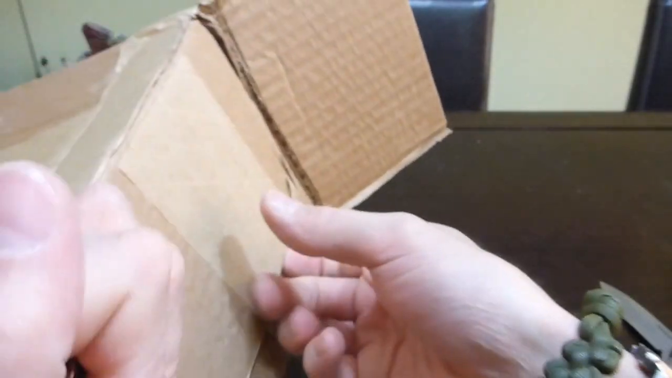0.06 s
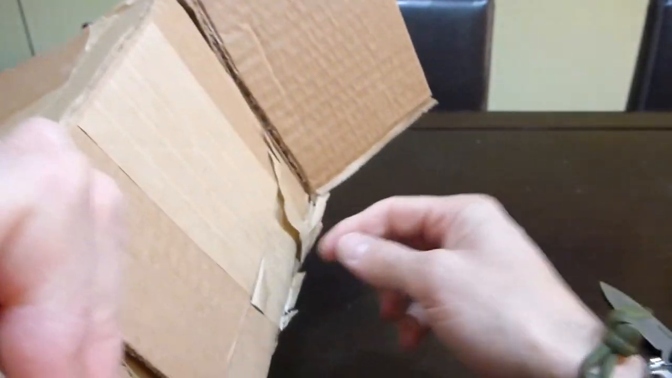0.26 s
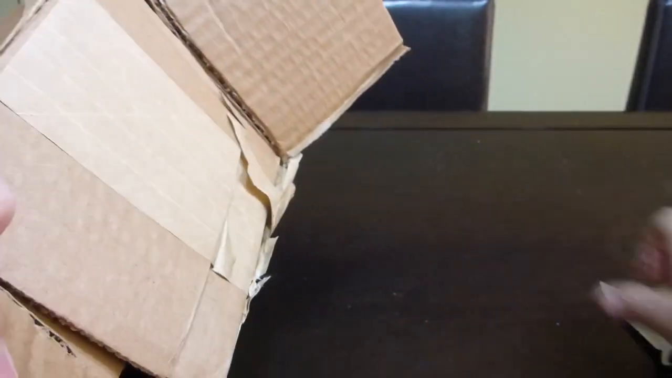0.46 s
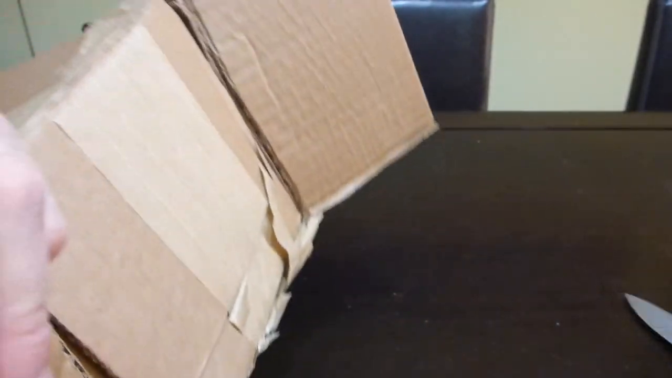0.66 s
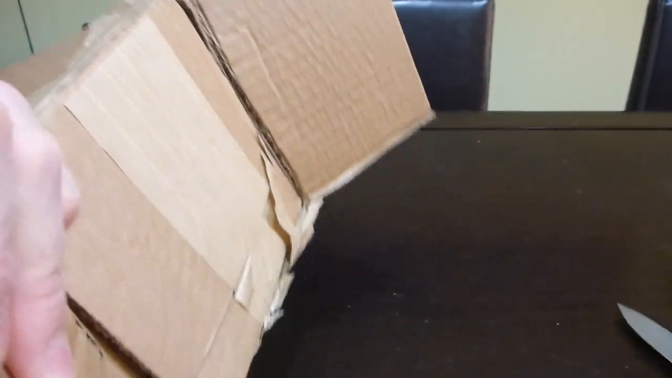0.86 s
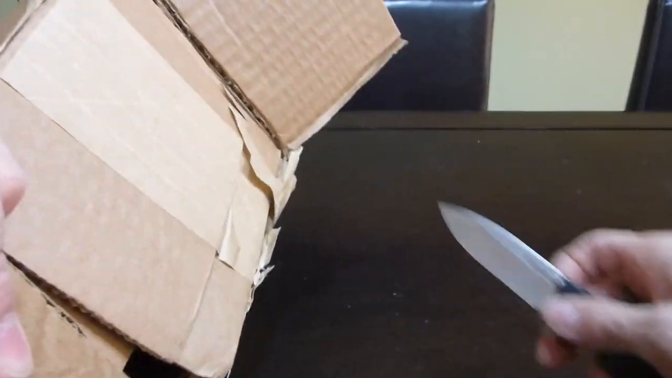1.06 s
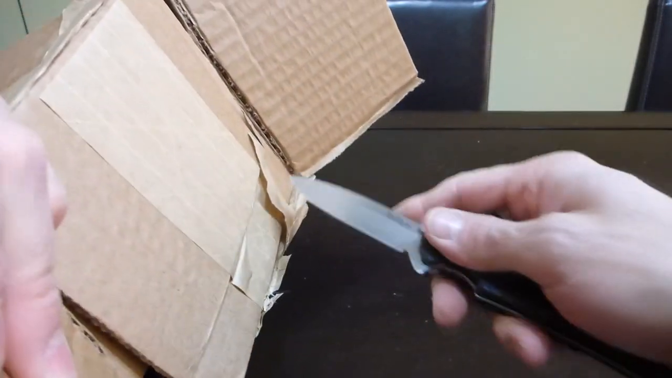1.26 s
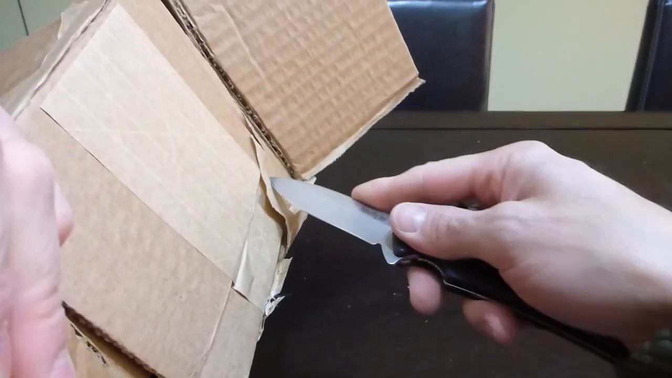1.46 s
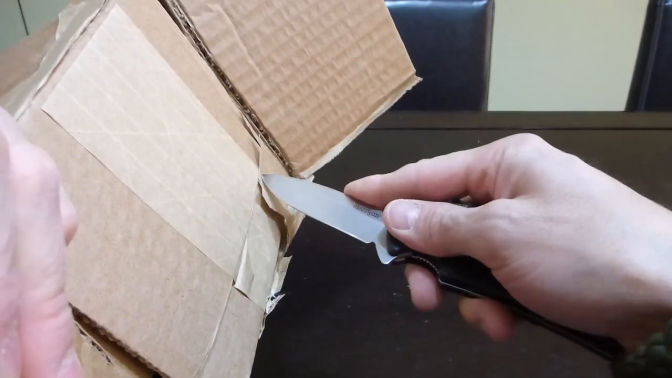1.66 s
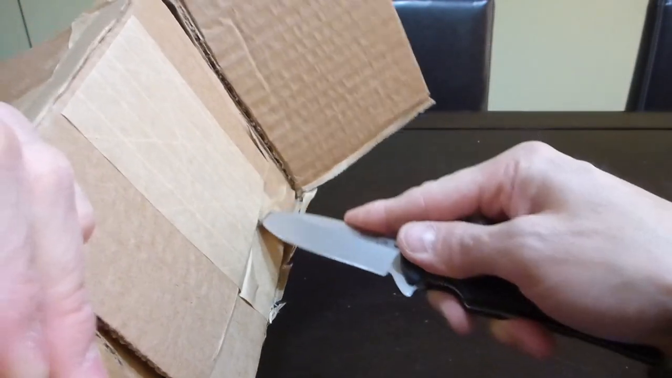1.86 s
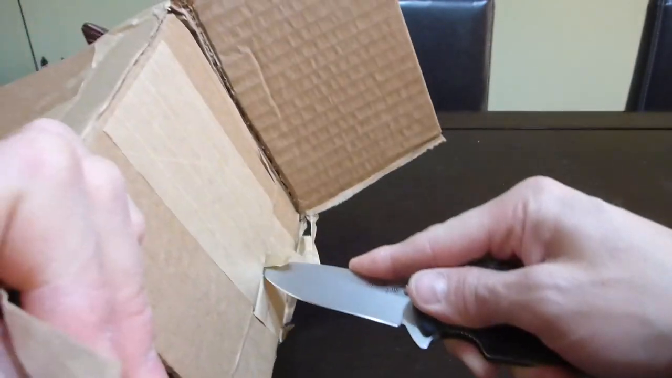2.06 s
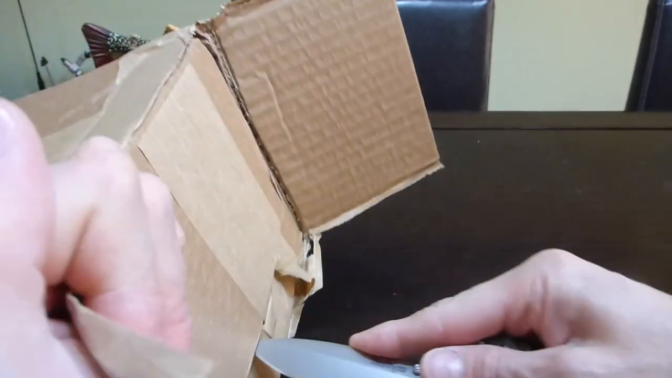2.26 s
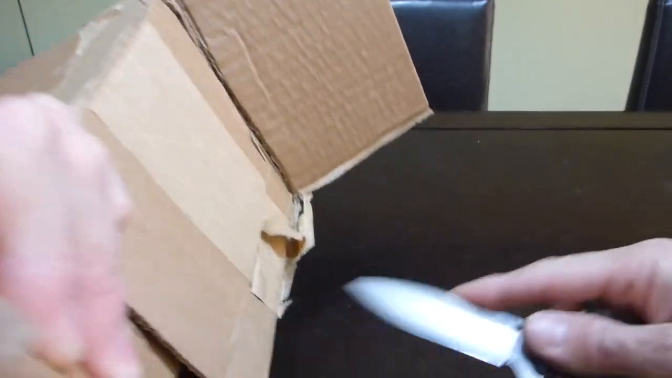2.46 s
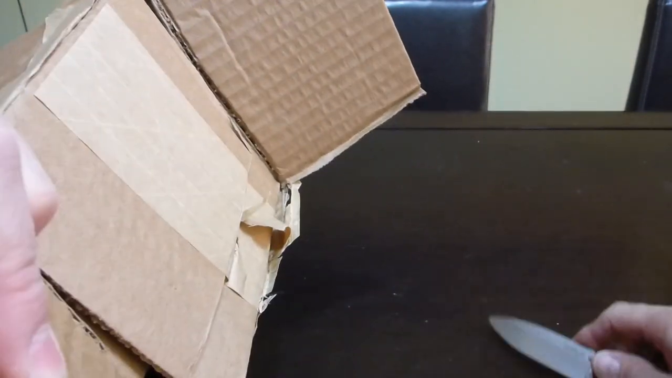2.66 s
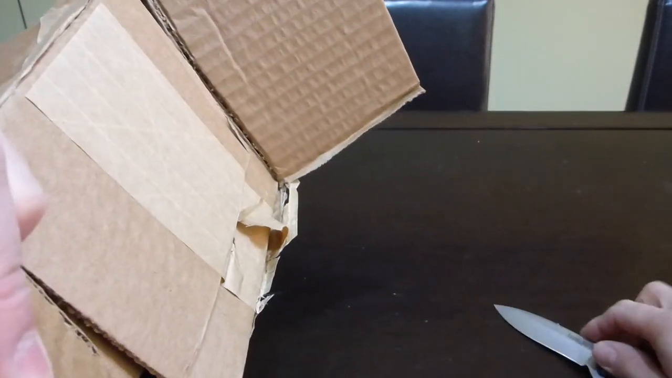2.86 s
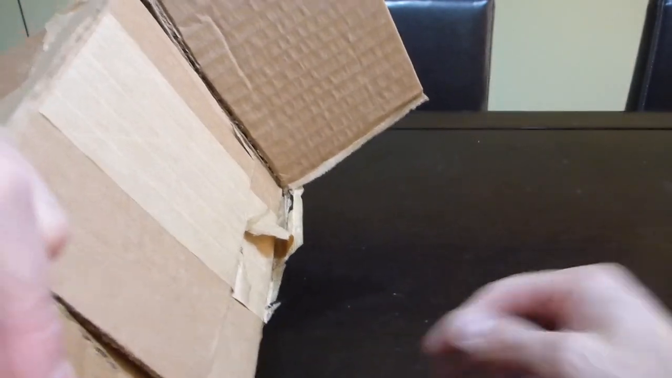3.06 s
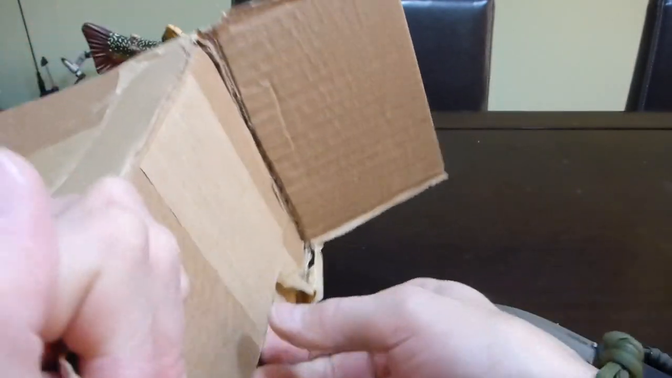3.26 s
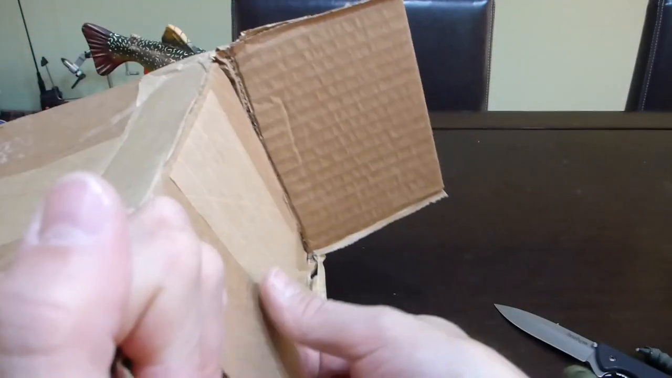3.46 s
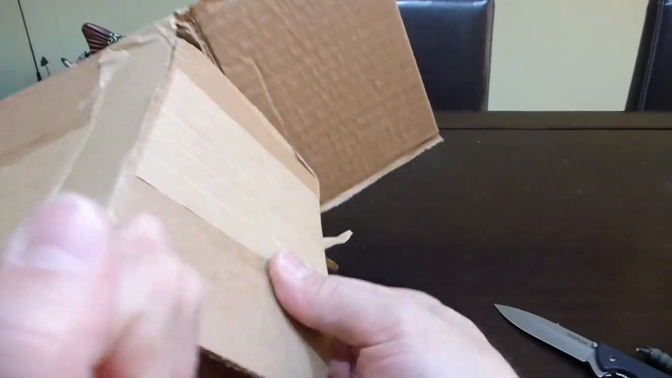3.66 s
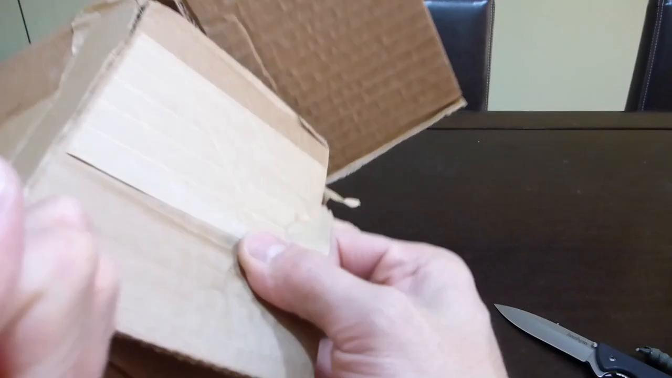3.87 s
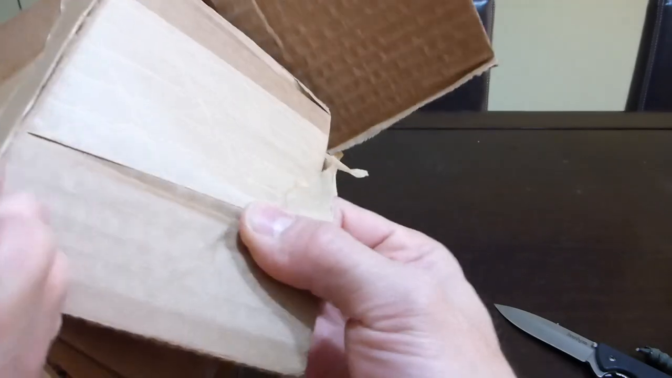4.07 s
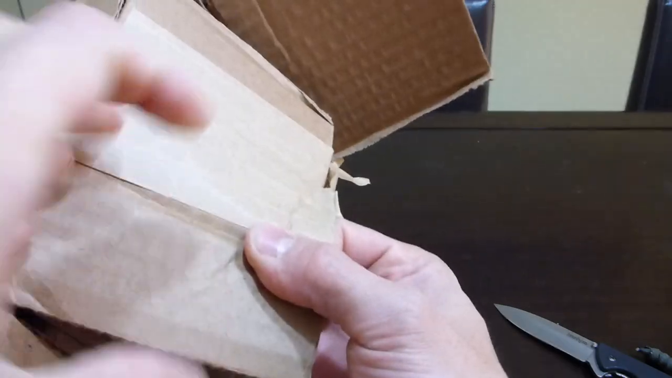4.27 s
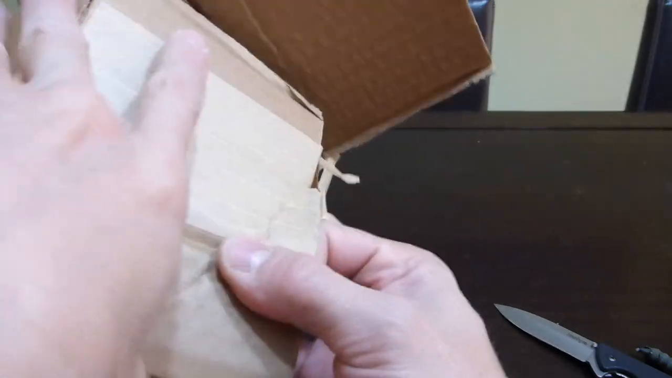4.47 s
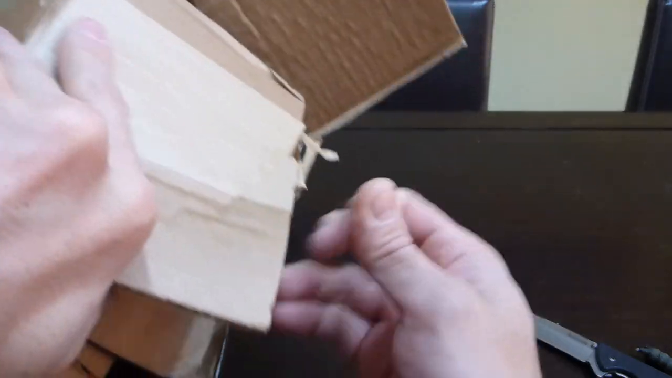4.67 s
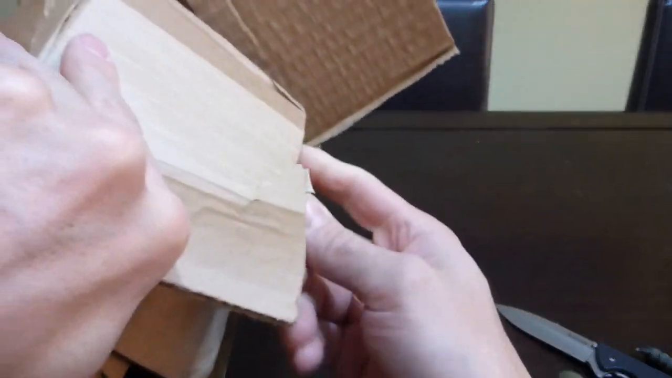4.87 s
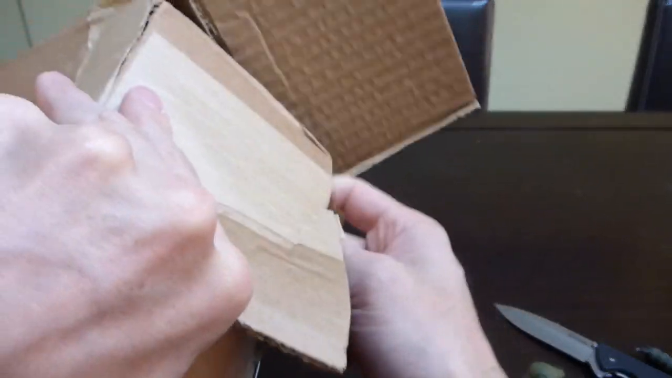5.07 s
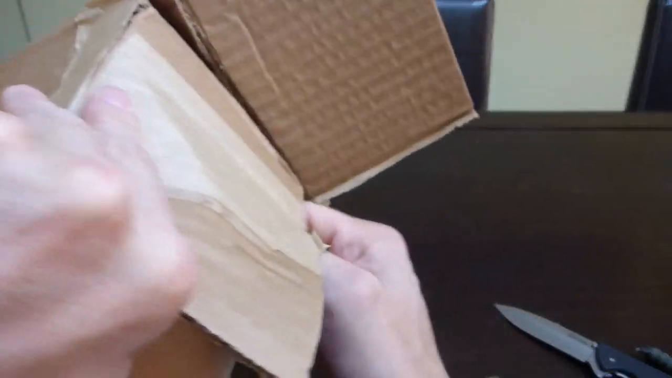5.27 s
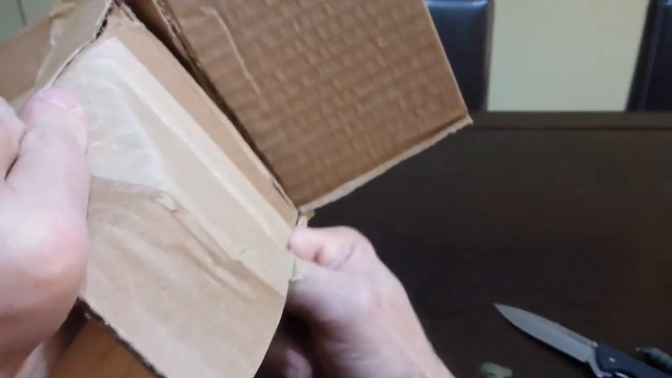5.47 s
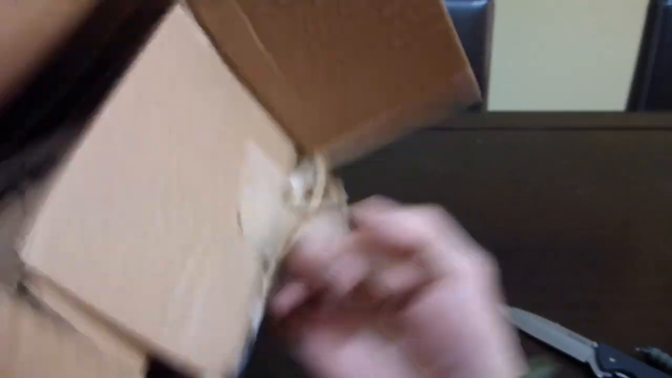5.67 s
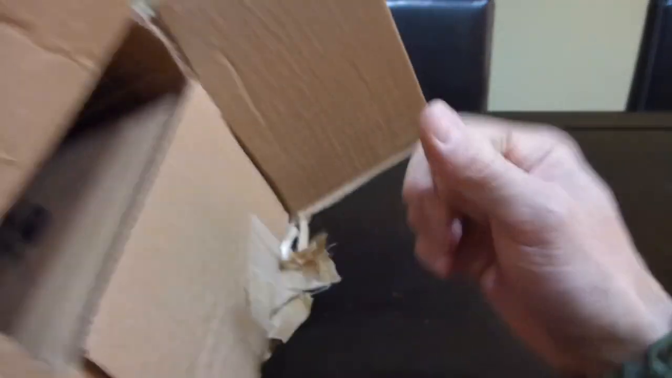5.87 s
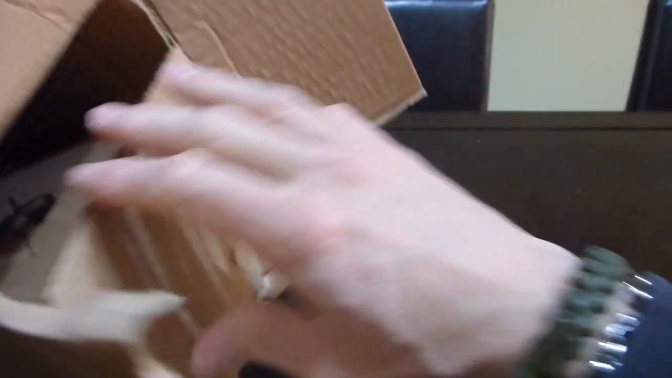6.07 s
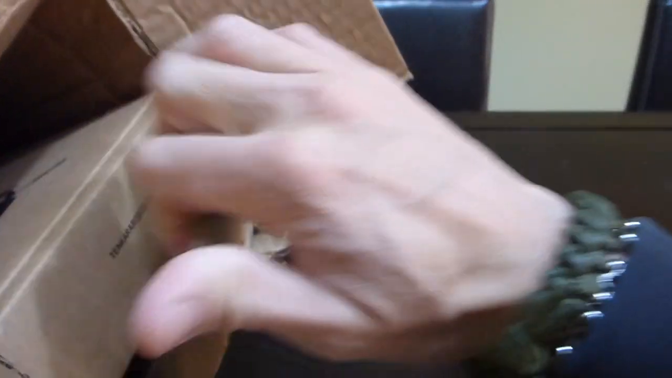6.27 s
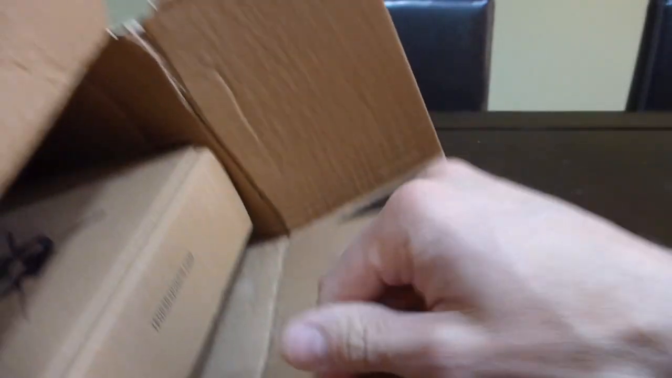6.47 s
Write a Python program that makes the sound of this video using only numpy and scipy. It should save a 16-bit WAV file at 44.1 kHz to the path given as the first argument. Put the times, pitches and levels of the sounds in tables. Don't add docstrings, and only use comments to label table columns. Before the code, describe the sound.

Close cardboard unboxing: dry scrapes, hollow bumps and tape snaps, hard knife knocks on wood, ending in loud pops and a tearing flap.

```python
import sys
import numpy as np
from scipy import signal
from scipy.fft import rfft, irfft
from scipy.io import wavfile
from scipy.ndimage import uniform_filter1d

SR = 44100
rng = np.random.default_rng(int(sys.argv[2]) if len(sys.argv) > 2 else 0)


def voltage_ratio(level):
    return 10 ** (np.asarray(level, float) / 20)


def store_pcm(level_fs):
    pcm = np.round(np.clip(level_fs, -1, 1) * 32767).astype(np.int16)
    wavfile.write(sys.argv[1], SR, np.atleast_2d(pcm).T)


N = 287796

# t/s, left minus right/dB
HAND_SIDE = [(0.1, -3), (.6, -6.5), (.95, 7), (3.3, 3.5), (3.6, -3), (6.4, 0.5)]


def unit(x):
    return x / np.sqrt(np.mean(x ** 2) + 1e-30)


def spread(mid, side, apart=1):
    return mid + apart * side * np.array([[1], [-1]])


def colour(x, points):
    hz, db = np.transpose(points)
    size = 8192
    f = np.arange(size // 2 + 1) * SR / size + 1
    log_gain = np.interp(np.log(f), np.log(hz), db) * np.log(10) / 20
    cepstrum = irfft(log_gain)[:size // 2]
    cepstrum[1:] *= 2
    response = irfft(np.exp(rfft(cepstrum, size)))[:size // 2]
    response = response.reshape((1,) * (x.ndim - 1) + (-1,))
    return signal.fftconvolve(x, response, axes=-1)[..., :x.shape[-1]]


def hump(hz, low_db, high_db):
    return [(hz / 8, -low_db), (hz, 0), (hz * 8, -high_db), (hz * 64, -2 * high_db)]


def fade(seconds, t60_s):
    return np.exp(-np.log(1000) * np.arange(int(seconds * SR)) / SR / t60_s)


def jolt(seconds, t60_s, spike, rise_s):
    decay = fade(seconds, t60_s) + spike * fade(seconds, t60_s / 6)
    return decay * (1 - fade(seconds, rise_s))


def ring(modes, seconds):
    t_s = np.arange(int(seconds * SR)) / SR
    return sum(voltage_ratio(db) * np.sin(2 * np.pi * hz * t_s) * fade(seconds, t60_s) for hz, db, t60_s in modes)


def add(out, s, sound, peak_db, pan_db=0):
    i = int(s * SR)
    sound = sound[..., :N - i] * voltage_ratio(peak_db) / np.abs(sound).max()
    out[:, i:i + sound.shape[-1]] += sound * voltage_ratio(np.array([[pan_db / 2], [-pan_db / 2]]))


def grains(per_s, scatter_db, points, t60_s, apart):
    clump_db = 2
    chance = rng.random((2, N))
    size = voltage_ratio(-scatter_db * np.log(1 - 0.97 * chance[1])) * (chance[0] < per_s / SR)
    pulse = fade(0.15, t60_s) * (1 - fade(0.15, t60_s / 2))
    shaking = np.sqrt(np.abs(signal.fftconvolve(size ** 2, pulse ** 2)[:N]))
    hold = SR // 50
    steps = np.repeat(rng.standard_normal(N // hold + 1), hold)[:N]
    clump = uniform_filter1d(steps, hold)
    mid, side = rng.standard_normal((2, N))
    return unit(colour(spread(mid, side, apart) * shaking * voltage_ratio(clump_db * clump), points))


def effort(layer_db, bright_share, shudder_db=0):
    press_db_s, lift_db_s, jolt_db_s = 420, 176, 4000
    # start t/s, length/s, level/dB, brightness/dB
    strokes = [(0, 0.041, -44, 1.5), (0.105, 0.25, -45, 4), (0.585, 0.043, -58, 3), (1.106, 0.15, -60, 5),
               (1.632, 0.014, -50.5, -3.5), (1.718, 0.13, -60.5, -25), (1.917, 0.23, -45.5, 1.5),
               (2.165, 0.013, -32.5, -2), (2.284, 0.082, -44, -1.5), (2.549, 0.29, -63.5, 1),
               (3.362, 0.18, -50.5, 4.5), (3.533, 0.17, -44.5, 2), (3.732, 0.054, -26, 0.5),
               (3.854, 0.11, -32.5, 2), (3.978, 0.14, -36.5, -1), (4.152, 0.091, -40, -0.5),
               (4.308, 0.013, -38, 3.5), (4.415, 0.064, -41, -0.5), (4.5, 0.067, -58.5, 15),
               (4.583, 0.01, -35.5, 3), (4.718, 0.044, -44.5, 4), (4.778, 0.0071, -33.5, 1.5),
               (4.854, 0.13, -42, -3.5), (5.008, 0.088, -51, 2), (5.132, 0.032, -44, 6.5),
               (5.238, 0.011, -33, 3), (5.34, 0.17, -41.5, 6.5), (5.674, 0.13, -44.5, 6),
               (6.27, 0.028, -40, -6), (6.384, 0.15, -39, 1.5)]
    # t/s, level/dB, decay/(dB/s), brightness/dB
    shudders = [
        (.4, -58.5, 31, 4.5),
        (0.747, -33.5, 88.5, -8),
        (.9, -46, 124.5, -20),
        (2.364, -23.5, 201, -5),
        (3.014, -21, 297, -14.5),
        (3.17, -46, 161, -3.5),
        (5.542, -23, 95, -2),
        (5.82, -20.5, 94, -1.5),
        (6.02, -34, 80, -6.5),
    ]
    moves = [(s, s + length_s, db, bright_db, press_db_s, lift_db_s) for s, length_s, db, bright_db in strokes]
    moves += [(s, s, db + shudder_db, bright_db, jolt_db_s, dying) for s, db, dying, bright_db in shudders]
    t_s = np.arange(N) / SR
    coarse_s = t_s[::64]
    power = 0
    for start, end, db, bright_db, rise, fall in moves:
        before_db = rise * np.maximum(start - coarse_s, 0)
        after_db = abs(fall) * np.maximum(coarse_s - end, 0)
        power = power + voltage_ratio(2 * (db + bright_share * bright_db - before_db - after_db))
    return voltage_ratio(layer_db) * np.interp(t_s, coarse_s, np.sqrt(power))


def rubbing():
    # f/Hz, density/dB
    boom_tone = [(18, -74.5), (30, -6), (163, -9.5), (250, -8.5), (383, -1), (461, -3.5), (509, -5.5),
                 (900, -10.5), (1170, -14), (1980, -120)]
    rasp_tone = [(290, -34), (500, -25), (638, -4), (1530, -4.5), (2200, -10.5), (3200, -18), (5000, -37),
                 (7700, -120)]
    fibre_tone = [(1300, -14), (2300, -2.5), (3200, -1.5), (5000, 2.5), (7000, -7.5), (10000, -21.5)]
    crackle_tone = [(4000, -25), (7000, 1), (10000, -3), (13000, -8.5), (16000, -15)]
    boom = effort(0.11, -0.28, shudder_db=6) * voltage_ratio(-3) * grains(200, 1.0, boom_tone, 0.078, 0.066)
    rasp = effort(-2.5, 0) * grains(400, 4.34, rasp_tone, 0.02, 0.089)
    fibre = effort(-7, 1.16) * voltage_ratio(-2.5) * grains(1000, 5.0, fibre_tone, 0.009, 0.8)
    crackle = effort(-20.5, 1.2, shudder_db=-0.5) * voltage_ratio(3.0) * grains(900, 4.0, crackle_tone, 0.032, 0.94)
    return boom + rasp + fibre + crackle


def knocks():
    # t/s, peak/dB, centre f/Hz, t60/s
    bumps = [(0.6239, -22, 962, 0.022), (0.829, -16, 850, 0.12), (.872, -12, 703, 0.1),
             (0.927, -22, 716, 0.071), (1.187, -36.5, 586, 0.14), (1.687, -37.5, 1160, 0.066),
             (2.326, -24.5, 560, 0.074), (2.776, -40.5, 490, 0.28), (2.824, -35, 313, 0.071),
             (3.031, -21, 378, 0.015), (3.057, -20.5, 627, 0.28), (3.156, -23.5, 528, 0.22),
             (3.189, -28.5, 323, 0.094), (3.848, -25, 550, 0.036), (3.93, -14.5, 430, 0.15),
             (4.167, -33, 289, 0.23), (4.3042, -25, 1174, 0.22), (4.483, -23, 516, 0.19),
             (4.616, -22.5, 1126, 0.062), (4.776, -24, 436.5, 0.21), (4.796, -23.5, 403, 0.17),
             (5.913, -16, 416, 0.1), (6.124, -21, 490, 0.11)]
    # t/s, peak/dB, t60/s
    thuds = [(0.15, -23, 0.086), (.169, -58, .11), (0.369, -26, 0.044), (1.008, -22.5, 0.087),
             (1.631, -37.5, 0.04), (2.148, -20, 0.042), (2.177, -22.5, 0.042), (2.387, -14, 0.05),
             (3.342, -29, 0.24), (3.733, -19, 0.035), (4.236, -29.5, 0.16), (4.88, -26, 0.096),
             (5.182, -26, 0.1), (5.269, -26.5, 0.068), (5.718, -21.5, 0.057), (5.84, -14.5, 0.14),
             (5.878, -9.5, 0.1), (5.988, -19.5, 0.13), (6.28, -22, 0.2), (6.413, -34, 0.098),
             (6.498, -32, 0.027)]
    # t/s, peak/dB, centre f/Hz,
    # t60/s
    buckles = [(0.862, -20, 1460, 0.08), (2.197, -18.5, 715, 0.043), (2.357, -12, 987, 0.079),
               (2.97, -17.5, 1340, 0.085), (3.532, -19.5, 1540, 0.026), (3.65, -19, 1237, 0.14),
               (3.714, -15.5, 1820, 0.11), (3.912, -3, 936, 0.08), (4.421, -17, 2290, 0.064),
               (4.599, -20, 960, 0.12), (5.257, -9.5, 2000, 0.007), (5.401, -20, 970, 0.12),
               (5.4616, -17, 1120, 0.024), (5.4755, -6.5, 1010, 0.028), (5.532, -5, 1350, 0.018),
               (5.5374, -8, 774, 0.05), (5.637, -14, 1290, 0.02), (5.6412, -19, 1140, 0.025),
               (5.8094, -12.5, 1060, 0.015), (6.052, -13.5, 1370, 0.024), (6.357, -19.5, 1516, 0.036)]
    wall_hz = 399
    bump_boom_db, thud_boom_db, buckle_boom_db = 2.5, -31, -42
    blows = [(*row, bump_boom_db) for row in bumps]
    blows += [(*row, buckle_boom_db) for row in buckles]
    blows += [(s, db, wall_hz, t60_s, thud_boom_db) for s, db, t60_s in thuds]
    blows.sort()
    out, shake = np.zeros((2, N)), rng.standard_normal(N + SR)
    chance = rng.random((len(blows), 3, 16))
    for (s, db, hz, t60_s, boom_db), (place, size, life) in zip(blows, chance):
        noise, t60_s = shake[int(s * SR):], np.clip(t60_s, 0.008, 0.3)
        push = noise[:SR // 50] * fade(1 / 50, 0.16 * t60_s)
        mode_hz = hz * 2 ** (3.2 * (place - 0.65))
        mode_db = -9 * np.abs(np.log2(mode_hz / hz)) - 6 * size
        mode_t60_s = t60_s * (0.51 + 0.5 * life) * (hz / mode_hz) ** 0.5
        panel = ring(zip(mode_hz, mode_db, mode_t60_s), 1 / 5)
        add(out, s, signal.fftconvolve(panel, push), db)
        rattle = noise[:SR // 4] * jolt(1 / 4, 1.28 * t60_s, 1.0, 0.0066)
        add(out, s, colour(rattle, hump(hz, 40.7, 27.7)), db + 0.5)
        add(out, s, ring([(hz, 0, 8 / hz)], 1 / 20), db + 7 * np.log2(hz / 1100))
        boom = ring(zip(150 + 350 * place[:8], -8 * size, 0.13 + 0.19 * life), 1 / 5)
        add(out, s, signal.fftconvolve(boom, push), db + boom_db - 6.0)
    return colour(out, [(1900, -1.5), (4500, -14.5)])


def pops():
    # t/s, peak/dB, f/Hz
    breaks = [(0.7379, -5.5, 1380), (0.826, -16, 910), (0.863, -13, 1293), (2.148, -20.5, 1200),
              (5.5333, -2.5, 1200), (5.4758, -14.5, 1172), (2.3583, -10, 1630), (2.865, -5, 1560),
              (2.9987, -6, 840), (3.9127, -4.5, 1117), (3.915, -8.5, 1020), (4.304, -18, 1380),
              (4.802, -21.5, 897), (5.462, -21, 1200), (5.5311, 0.1, 1140), (5.5358, -2, 1240),
              (5.636, -6.5, 1420), (5.642, -7.5, 1270), (5.72, -24, 1330), (5.8105, 2.2, 1185),
              (5.865, -12, 620), (6.055, -27, 1340), (6.412, -29, 1350)]
    decay_cycles, rise_cycles = 7, 4
    out = np.zeros((2, N))
    for s, db, hz in breaks:
        t60_s = decay_cycles / hz
        cycles = ring([(hz, 0, t60_s), (1.6 * hz, -14, t60_s)], 1 / 20)
        add(out, s, cycles * (1 - fade(1 / 20, rise_cycles / hz)), db)
    return out


def snaps():
    # t/s, peak/dB, treble/dB, left minus right/dB
    sharp_cracks = [(0.737, -27, -49.5, 12), (0.8271, -22, -24, 7.5), (0.861, -43, -26, 8),
                    (2.148, -19.5, -16.5, 12), (2.1766, -20, -30.5, -2), (2.359, -12.5, -35.5, -3.5),
                    (2.386, -23.5, -37.5, 12), (2.8648, -20, -18, 12), (2.968, -38, -38, 9.5),
                    (3.651, -18, -27, 0.5), (3.7145, -34, -37, 12), (3.855, -26.5, -29.5, 8),
                    (3.914, -6.5, -29, 16), (4.3045, -30, -41, -2), (4.421, -28, -59, -8), (4.4327, -27, -20, -2),
                    (4.483, -29.5, -13, -3), (5.132, -33, -36, -3), (5.236, -23, -30, -1), (5.269, -20, -34, -4),
                    (5.399, -18, -40, -2), (5.435, -29.5, -11, -5), (5.4751, -17.5, -15, -3.5),
                    (5.532, -10.5, -17, -3.5), (5.6353, -13, -20, -2.5), (5.643, -18, -39, 4),
                    (5.8102, -15, -16.5, -13.5), (5.907, -24, -19, 3), (6.4958, -26, -29.5, 12)]
    # t/s, peak/dB
    fibres = [(0.0798, -36), (0.108, -40), (0.1463, -34.5), (0.203, -59), (0.282, -35.5), (0.367, -38),
              (0.611, -42.5), (.625, -30), (.746, -37.5), (0.817, -34), (.8451, -43), (0.8706, -36.5),
              (.894, -39), (1.0585, -47), (1.0857, -49.5), (0.925, -42), (1.0084, -46), (1.1019, -42.5),
              (1.206, -43.5), (1.2568, -43.5), (1.688, -43), (1.7837, -49), (2.3273, -34), (2.4975, -33.5),
              (2.521, -43), (3.3388, -40.5), (3.5329, -28.5), (4.2268, -40), (4.7161, -39), (4.774, -32.5),
              (5.2582, -22.5), (6.025, -34), (6.052, -40), (6.257, -50), (6.2772, -32.5), (6.357, -33)]
    fibre_treble_db = -16.5
    ticks = [(s, db, fibre_treble_db, np.interp(s, *np.transpose(HAND_SIDE))) for s, db in fibres]
    out, shake = np.zeros((2, N)), rng.standard_normal((2, N + SR))
    shape = (fade(0.1, 0.0066) + 0.075 * fade(0.1, 0.094)) * (1 - fade(0.1, 0.0026))
    for s, db, treble_db, pan_db in sharp_cracks + ticks:
        mid, side = shake[:, int(s * SR):int(s * SR) + len(shape)]
        crack = spread(mid, side, 1.1) * shape
        tone = [(500, -10.5), (2500, 1.5), (4900, 8.0), (11000, treble_db + 7.5), (16000, 0.67 * treble_db - 2.5)]
        add(out, s, colour(crack, tone), db + 6.5, np.clip(pan_db, -12, 12))
    return out


def creases():
    # t/s, peak/dB, centre f/Hz, t60/s
    slip_bursts = [(.128, -37, 4200, .05), (.18, -37, 3300, 0.045), (0.205, -35.5, 6500, 0.018),
                   (.23, -40, 3430, 0.014), (0.267, -35, 5000, 0.012), (.307, -34, 5200, .015),
                   (.331, -44, 5000, .015), (1.27, -40.5, 5500, 0.036), (1.319, -52.5, 4510, .015),
                   (1.375, -55.5, 5500, .1), (1.625, -47.5, 5170, 0.066), (1.695, -47, 6400, 0.055),
                   (.815, -17, 334, 0.33), (0.875, -15, 794, 0.086), (.93, -35, 990, 0.049),
                   (1.017, -27, 527, 0.12), (2.122, -34, 3200, 0.041), (2.179, -21.5, 4770, .04),
                   (2.194, -26, 4740, 0.064), (2.297, -37, 5200, .02), (2.33, -32, 5860, 0.029),
                   (2.3565, -15.5, 4900, 0.045), (2.389, -21.5, 5330, 0.058), (2.391, -23.5, 2040, 0.12),
                   (2.87, -30, 3590, 0.2), (3.011, -23, 2580, 0.065), (0.74, -17, 2500, 0.033),
                   (2.91, -40.5, 8500, 0.08), (2.9984, -23.5, 6200, .015), (3.1226, -26.5, 5650, .012),
                   (3.645, -33, 990, 0.039), (3.659, -24, 3240, 0.085), (3.685, -35, 1460, .04),
                   (3.74, -22, 1300, 0.049), (3.769, -20.5, 4040, 0.052), (3.786, -32, 1300, 0.058),
                   (3.802, -20, 1410, 0.061), (3.805, -27, 4800, 0.021), (3.884, -31, 4700, 0.025),
                   (3.906, -17, 1510, 0.059), (3.917, -12.5, 4670, 0.046), (3.922, -11.5, 450, 0.023),
                   (3.932, -17, 1560, 0.07), (3.965, -20, 1530, 0.083), (4.276, -39, 1150, .04),
                   (4.316, -23.5, 3100, 0.089), (4.421, -7, 2800, 0.0047), (4.488, -27, 1060, 0.035),
                   (4.586, -25, 3540, .06),
                   (4.432, -27, 2500, 0.046), (4.816, -32, 796, 0.037), (5.181, -24.5, 1510, 0.036),
            (5.242, -19.5, 1470, 0.056), (6.25, -44, 2500, .015), (6.28, -36, 5300, 0.026),
            (6.48, -25, 4300, 0.038), (4.62, -25.5, 1190, 0.054), (4.748, -39, 3000, 0.036),
            (5.111, -35, 1580, 0.026), (5.142, -30, 1550, 0.037), (5.161, -30, 1740, 0.044),
            (5.231, -25, 1690, 0.044), (5.313, -27, 2110, 0.026), (5.334, -43, 1610, 0.025),
            (5.434, -21, 1220, 0.017), (5.46, -29, 4000, 0.01), (5.546, -20, 1300, 0.13),
            (5.555, -20, 2730, 0.34), (5.563, -11.5, 850, 0.12), (5.596, -19, 886, 0.085),
            (5.637, -24, 5170, 0.0086), (5.6408, -11, 4670, .015), (5.66, -25, 4900, 0.021),
            (5.8118, -20, 1240, 0.014), (5.824, -13.5, 1280, 0.066), (5.841, -14.5, 700, 0.11),
            (5.85, -22.5, 4450, 0.21), (5.867, -15.5, 600, 0.038), (5.876, -13, 1020, 0.05),
            (5.884, -26, 7500, 0.017), (5.906, -7, 1380, 0.019), (5.916, -17, 520, .03),
            (5.999, -29, 500, 0.056), (6.094, -29, 980, 0.039), (6.125, -25.5, 1470, 0.071),
            (6.181, -25, 1150, 0.047), (6.2583, -28.5, 1840, .03), (6.276, -20.5, 1860, 0.043),
            (6.4288, -33, 1050, 0.049), (6.479, -25.5, 2080, 0.15)]
    slope_db, apart_hz = 62, 2500
    out, shake = np.zeros((2, N)), rng.standard_normal((2, N + SR))
    for s, db, hz, t60_s in slip_bursts:
        mid, side = shake[:, int(s * SR):int(s * SR) + SR // 4]
        apart, t60_s = np.clip(hz / apart_hz, 0.35, 2), np.clip(t60_s, 0.006, 0.3)
        slips = spread(mid, side, apart) * jolt(1 / 4, t60_s, 0.47, 0.1 * t60_s)
        pan_db = min(apart, 1) * np.interp(s, *np.transpose(HAND_SIDE))
        add(out, s, colour(slips, hump(hz, slope_db, slope_db)), db, pan_db)
    return out


def knife():
    # t/s, peak/dB
    clacks = [
        (0.738, 0.5),
        (2.866, -4.5),
        (3, -5.5),
    ]
    # f/Hz, level/dB, t60/s
    table_modes = [
        [(363, -3.5, 0.051), (490, -9.5, 0.13), (693, -4, 0.16), (1955, -13, 0.09), (1073, -16.5, 0.15),
         (1360, -12, 0.34), (1640, -16, 0.07), (2390, -29.5, 0.14), (2660, -21, 0.086)],
        [(336, -8, 0.32), (882, -4.5, 0.13), (1025, -4, 0.12), (1380, -1, 0.11), (1525, -7, 0.05),
         (1585, -6, 0.1), (2080, -20, 0.11), (1845, -21, 0.057), (3980, -24, 0.13)],
        [(290, -3.5, 0.32), (382, -2, 2.7), (700, 0, 5.0), (1060, -2, 0.21), (1352, -5, 0.17),
         (1710, -17.5, 0.61), (1964, -8.5, 0.17), (2600, -16, 0.37), (3270, -22, 0.12)],
    ]
    # t/s, peak/dB
    bounces = [
        (.8615, -17),
        (0.925, -44),
        (1.008, -34),
        (2.968, -24),
        (3.029, -24),
        (3.062, -24),
    ]
    # f/Hz, level/dB, t60/s
    handle_modes = [(1370, -9, 0.053), (2000, 4, 0.022), (2690, 1, 0.02), (3370, -17, 0.025)]
    clatter_tone = [(45, -30.5), (110, -14.5), (500, -3.5), (1600, -8.0),
                    (3000, -25.5), (4500, -30), (7000, -32.5), (16000, -89.0)]
    out = np.zeros((2, N))
    for (s, db), modes in zip(clacks, table_modes):
        short = [(hz, mode_db, min(t60_s, 0.12)) for hz, mode_db, t60_s in modes]
        chatter = rng.standard_normal(SR // 4)
        strike = chatter * jolt(1 / 4, 0.028, 5.7, 0.00066)
        add(out, s, signal.fftconvolve(ring(short, 0.2), strike), db - 2.0)
        clatter = chatter * jolt(1 / 4, 0.2, 0.61, 0.0058)
        add(out, s, colour(clatter, clatter_tone), db - 9.5)
    for s, db in bounces:
        add(out, s, ring(handle_modes, 0.2) * (1 - fade(0.2, 0.0033)), db)
    return out


def puffs():
    # t/s, peak/dB, f/Hz, t60/s
    pushes = [(0, -29, 389, 0.037), (0.046, -36.5, 398, 0.066), (0.069, -41.5, 413, 0.069),
              (0.169, -33, 109, 0.057), (0.288, -33, 124, 0.05), (0.374, -32, 385, 0.11),
              (0.949, -49.5, 155, 0.1), (1.952, -42.5, 129, 0.1), (4.699, -40, 89.8, 0.22),
              (5.635, -19, 358, 0.063), (5.809, -8.5, 320, 0.021), (5.812, -13, 114, 0.057),
              (5.862, -24, 99, 0.1), (6.279, -18.5, 387, 0.068)]
    out = np.zeros((2, N))
    for s, db, hz, t60_s in pushes:
        tone = ring([(hz, 0, t60_s), (0.84 * hz, -6, 0.65 * t60_s)], 0.3)
        add(out, s, tone * (1 - fade(0.3, 0.19 * t60_s)), db)
    return out


def room(x):
    # f/Hz, t60/s
    decay = [(100, 0.49), (400, 0.59), (1500, 0.44), (4000, 0.4), (12000, 0.2)]
    hz, t60_s = np.transpose(decay)
    tail = 0
    for f in 60 * 2.0 ** np.arange(9):
        mid, side = colour(rng.standard_normal((2, SR)), hump(f, 33, 33))
        both = spread(mid, side, np.clip(f / 2200, 0.4, 1))
        tail = tail + both * fade(1, np.interp(np.log(f), np.log(hz), t60_s))
    tail *= 1 - fade(1, 0.031)
    tail /= np.sqrt((tail ** 2).sum() / 2)
    return signal.fftconvolve(x[None], tail, axes=1)[:, :N]


def hush():
    # f/Hz, density/dB
    hush_tone = [(15, -42.5), (25, -5), (96, 0), (215, -10.5), (297, 2), (566, -9), (1050, -5.5),
                 (15500, -25)]
    level_db = -67.5
    mid, side = colour(rng.standard_normal((2, N)), hush_tone)
    side = colour(side, [(200, -14.0), (3000, 3.5)])
    return unit(spread(mid, side)) * voltage_ratio(level_db)


def scene():
    port_lag_samples, room_db = 2, -12
    near = rubbing() + knocks() + puffs() + snaps() + knife() + creases() + pops()
    near[0] = np.roll(near[0], port_lag_samples)
    return near + voltage_ratio(room_db) * room(near.mean(axis=0))


def band_limit(x):
    return signal.sosfilt(signal.butter(12, 15620, fs=SR, output="sos"), x)


def record(dry):
    # f/Hz, gain/dB
    mic_tone = [(30, -25), (100, -14), (250, -3), (16000, -0.5)]
    left_shadow = [(2000, 0.5), (4500, -5), (12000, -2)]
    treble_edge = [(15200, 0), (15900, -19)]
    left, right = colour(dry, mic_tone)
    ports = np.array([colour(left, left_shadow), right])
    heard = colour(ports + hush(), treble_edge)
    return band_limit(np.clip(heard, -1, 1))


dry = scene()
out = record(dry)
store_pcm(out)
```